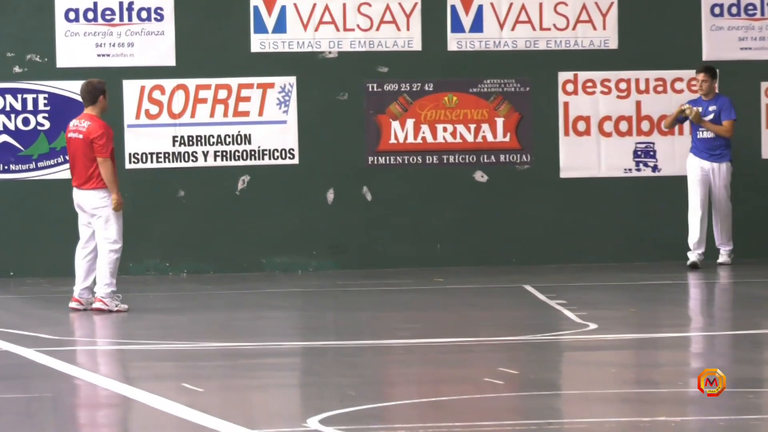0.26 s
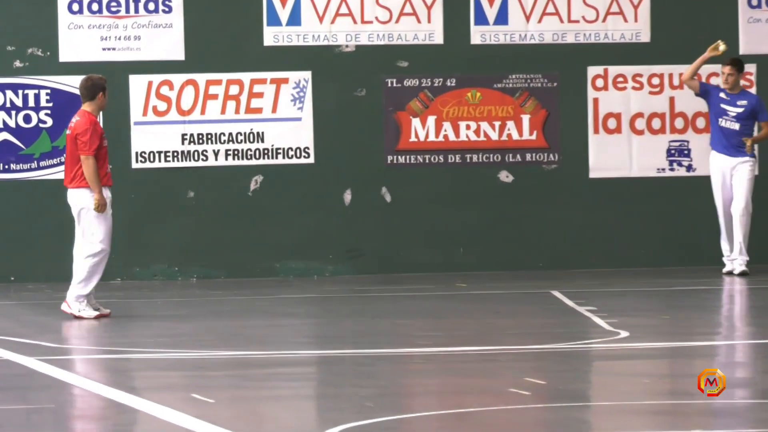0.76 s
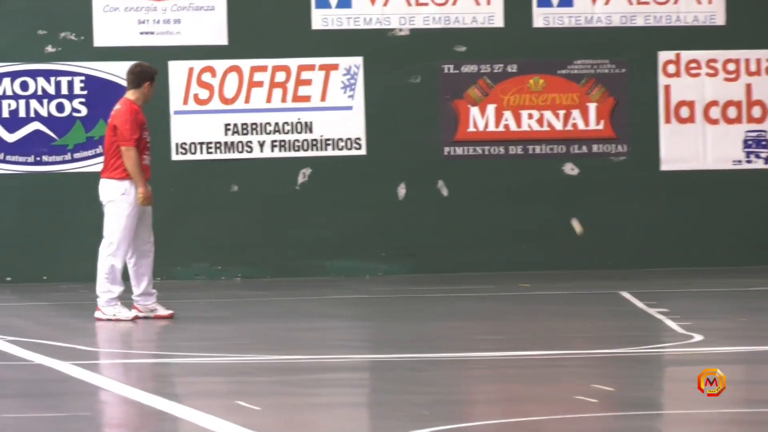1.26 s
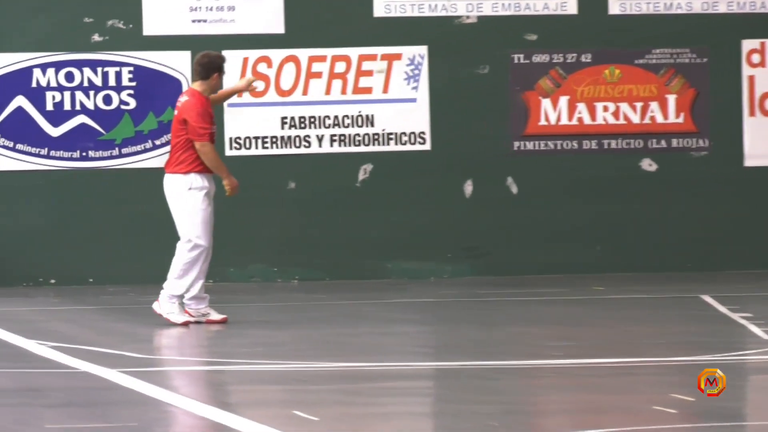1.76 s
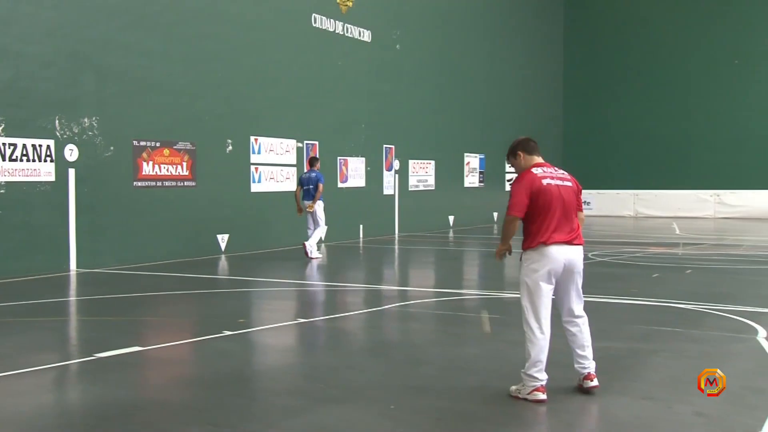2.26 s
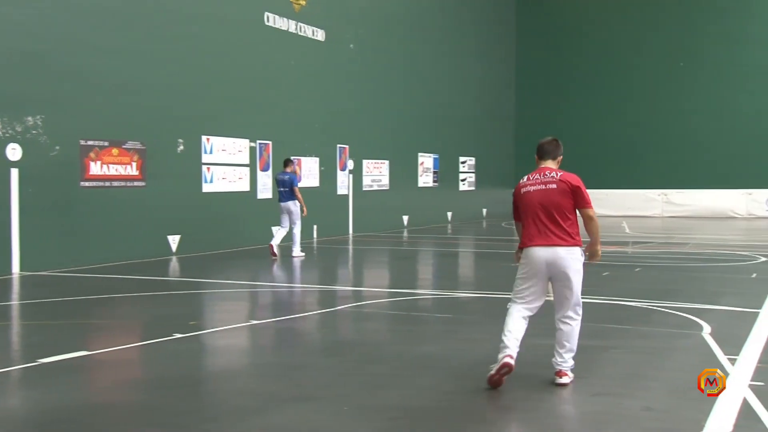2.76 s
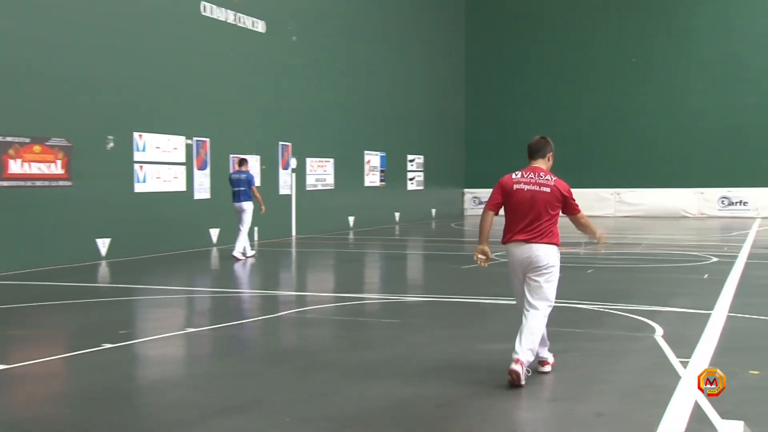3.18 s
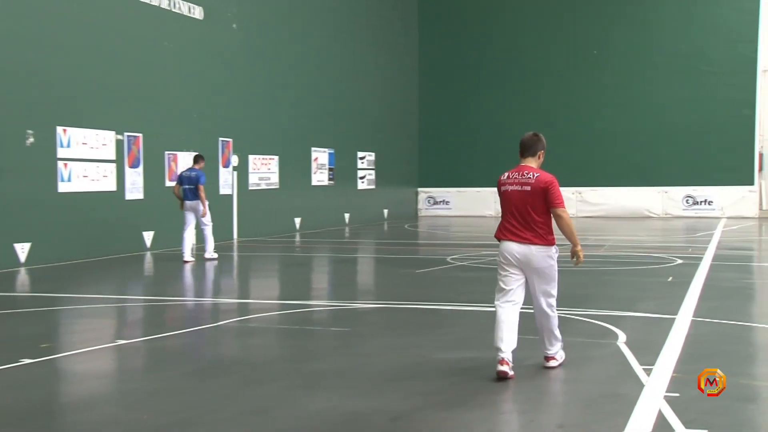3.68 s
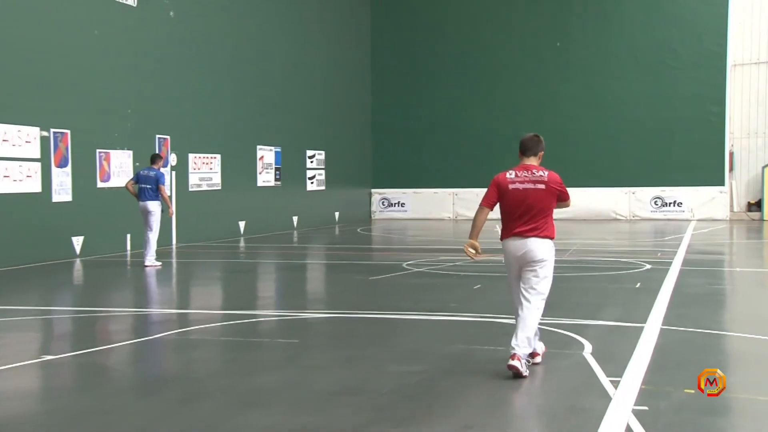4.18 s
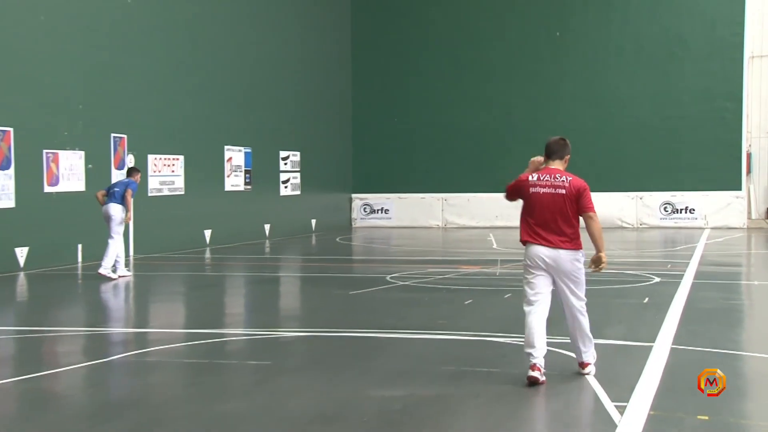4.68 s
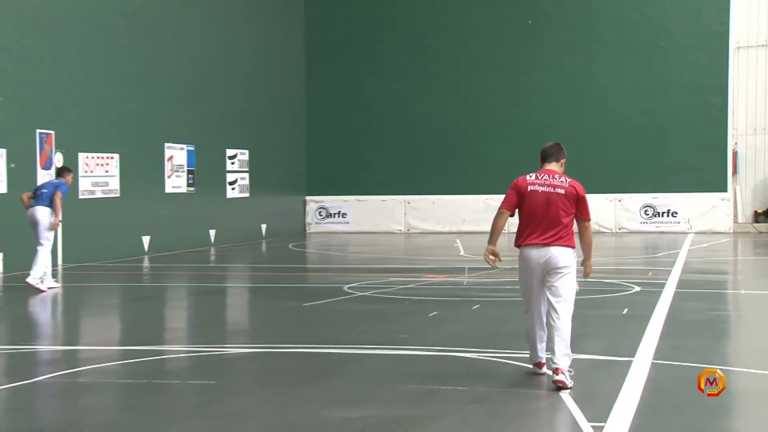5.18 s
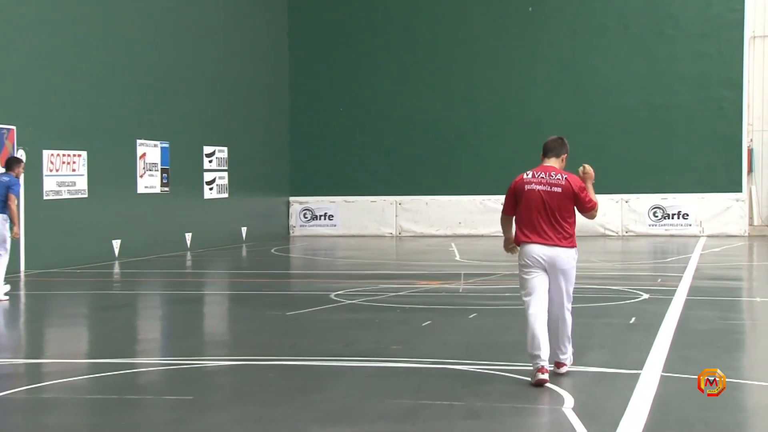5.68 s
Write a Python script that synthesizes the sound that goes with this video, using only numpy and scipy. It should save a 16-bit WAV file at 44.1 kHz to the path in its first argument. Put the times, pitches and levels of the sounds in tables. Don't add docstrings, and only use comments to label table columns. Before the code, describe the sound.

A hard small ball cracks loudly seven times on a concrete court, each bounce answered by sharp wall echoes and a long hall tail.

```python
import sys
import numpy as np
from scipy import signal
from scipy.io import wavfile

SR = 44100
rng = np.random.default_rng(int(sys.argv[2]) if len(sys.argv) > 2 else 0)


def convert_level_to_amplitude(level_db):
    exponent = np.asarray(level_db, float) / 20
    return 10 ** exponent


def to_wav(s):
    ch = np.atleast_2d(s).T
    pcm = np.round(np.clip(ch, -1, 1) * 32767)
    wavfile.write(sys.argv[1], SR, pcm.astype(np.int16))


N = 261513

# crack start in seconds, crack level in dB, first touch level in dB,
# slab reflection delay in ms, its level in dB.
HITS = [
    (1.3504, -1.6, -18.7, 1.4, -14.5),
    (2.3065, -11.7, -21.5, 2.5, -11.0),
    (2.8031, -9.8, -19.8, 3.0, -18.6),
    (3.289, -5.5, -11.9, 3.1, -9.9),
    (3.8402, -3.1, -12.3, 3.0, -7.0),
    (4.5024, -18.4, -17.1, 2.8, -13.5),
    (5.0027, -19.9, -23.9, 2.9, -19.7),
]
# thump level in dB, thump pitch in Hz, far thump level in dB, slap level in dB,
# edge level relative to crack in dB.
HIT_WEIGHTS = [(-34, 290, -46, -25.5, -19), (-36.5, 280, -43, -27, -18), (-31, 255, -37, -31, -25),
               (-32, 270, -38, -30, -27), (-33, 270, -42, -26, -23), (-34, 270, -38, -25, -13),
               (-35.5, 230, -39, -29, -23)]
# delay in ms, level in dB, level of its return across the court in dB,
# stray echo level in dB, slap pitch in Hz.
LONG_WALL = [(57.3, -4.9, -21, -24, 805), (60.2, -20.8, -24, -28, 1530), (58.8, -13.4, -17.8, -28, 818),
             (58.1, -11.9, -22.6, -19, 1470), (56.9, -5.1, -17.2, -18, 1510), (55.3, -13.3, -21, -17, 1420),
             (54.5, -21.5, -26.3, -30, 1400)]

ACROSS_MS, TOUCH_LEAD_MS, SLAP_LEAD_MS = 80.1, 1.9, 1.6


def at_hz(points, hz):
    points = np.array(points)
    return np.interp(np.log(hz), np.log(points[:, 0]), points[:, 1])


def resonate(x, hz, width_hz, count=1):
    r = np.exp(-np.pi * width_hz / SR)
    b = [(1 - r * r) / 2, 0, (r * r - 1) / 2]
    a = [1, -2 * r * np.cos(2 * np.pi * hz / SR), r * r]
    for _ in range(count):
        x = signal.lfilter(b, a, x)
    return x


def dull(x, hz):
    sos = signal.butter(4, min(hz, 20000), fs=SR, output="sos")
    return signal.sosfilt(sos, x)


def peak_one(x):
    return x / np.abs(x).max()


def add(out, s, sound):
    i = round(s * SR)
    out[i:i + len(sound)] += sound[:N - i]


def cracks():
    out, t = np.zeros(N), np.arange(800) / SR
    click = 1. * (t == 0)
    body = resonate(click, 1200, 1500, count=2) - 1.3 * resonate(click, 2600, 1200, count=2)
    body = peak_one(dull(body, 4500))
    edge = peak_one(dull(resonate(click, 7600, 3300, count=2), 10300))
    paths = arrivals()
    roughs = dull(rng.standard_normal((len(paths), len(t))), 5900)
    for (s, db, hz, body_db, edge_db, scatter_db), rough in zip(paths, roughs):
        shell = peak_one(resonate(dull(click, 6000), hz, 2200, count=3))
        wake = resonate(rough, .9 * hz, 3500, count=2) + convert_level_to_amplitude(body_db + 7) * resonate(rough, 1900, 2200)
        wake = convert_level_to_amplitude(scatter_db + 11) * wake * (1 - np.exp(-t / .0007)) * np.exp(-t / .004)
        crack = shell + convert_level_to_amplitude(body_db - .6) * body + convert_level_to_amplitude(edge_db - 1.5) * edge + wake
        add(out, s - .0005, convert_level_to_amplitude(db - .6) * crack)
    return out


def arrivals():
    # side wall delay in ms, level in dB,
    # roof delay in ms, level in dB.
    near_surfaces = [(25.3, -14.4, 39.8, -13.8), (21.5, -16.9, 41.2, -22.6), (20.8, -14.7, 42.1, -25),
                     (20.9, -15.9, 42.7, -11.2), (12.2, -18.1, 41.7, -8.5), (11.3, -18.3, 40.7, -13.6),
                     (11.1, -28, 40.8, -14.3)]
    # delay in ms, relative level in dB.
    stray_echoes = [(22.5, -1), (38.5, 1), (56.1, -.6), (133, -4)]
    # start in seconds,
    # peak level in dB, crack pitch in Hz, body relative level in dB, edge relative level in dB.
    loose_arrivals = [(2.4471, -6.6, 4700, -9.7, -40), (2.449, -15.4, 4530, -13, -32),
                      (2.5285, -21, 4940, -13.6, -40), (3.2992, -17.2, 3240, -12.8, -36),
                      (3.89, -18.1, 4870, -12.8, -5.3), (1.6274, -23.7, 3130, -18, -40)]
    # crack pitch in Hz, body rel dB, edge shift dB, scatter rel dB
    touch, direct, slab = (3750, -9.5, 6, -20), (4300, -12, 1.1, -22), (4050, -12, -1, -22)
    side, roof, wall = (4600, -22, 3, -18), (4150, -22, 3.5, -21), (4150, -4, 1.5, -22)
    back, stray, second_face = (3900, -5, 1.5, -16), (4200, -11, 3, -17), (3350, -6, -6, -26)
    # later by ms, rel dB
    slab_twin, roof_twin, back_twin, wall_twin = (1.9, -13), (3.1, -12), (3.1, -5), (1.7, 5)
    spread_db, spread_pitch = 1.5, .04
    body_loss_per_db = .35
    air_db_per_ms, touch_trim_db = .09, -1.6
    rows = []
    for hit, weight, near, far in zip(HITS, HIT_WEIGHTS, near_surfaces, LONG_WALL):
        s, db, touch_db, slab_ms, slab_db = hit
        side_ms, side_db, roof_ms, roof_db = near
        wall_ms, wall_db, return_db, stray_db, _ = far
        paths = [(-TOUCH_LEAD_MS, touch_db + touch_trim_db, touch),
                 (0, db, direct),
                 (slab_ms, slab_db, slab),
                 (side_ms, side_db, side),
                 (roof_ms, roof_db, roof),
                 (wall_ms, wall_db, wall),
                 (wall_ms + ACROSS_MS, return_db, back)]
        twins = zip([paths[k] for k in (2, 4, 6)], [slab_twin, roof_twin, back_twin])
        paths += [(ms + later, level + loss, colour) for (ms, level, colour), (later, loss) in twins]
        paths += [(wall_ms + wall_twin[0], stray_db + wall_twin[1], second_face)]
        paths += [(wall_ms + later, stray_db + loss, stray) for later, loss in stray_echoes]
        chance = rng.standard_normal((len(paths), 3))
        for (ms, level, (hz, body_db, edge_db, scatter_db)), (a, b, c) in zip(paths, chance):
            path_hz = hz * (1 + spread_pitch * a)
            path_body_db = min(body_db - body_loss_per_db * (level + 13) + spread_db * b, 0)
            path_edge_db = weight[-1] + edge_db - air_db_per_ms * ms + spread_db * c
            rows.append((s + ms / 1000, level, path_hz, path_body_db, path_edge_db, scatter_db))
    return rows + [(*row, -21) for row in loose_arrivals]


def snaps():
    snap_db, snap_hz, snap_s = -39.5, 6500, .0045
    out, t = np.zeros(N), np.arange(600) / SR
    sos = signal.butter(2, snap_hz, "high", fs=SR, output="sos")
    for (s, _, touch_db, *_), rough in zip(HITS, rng.standard_normal((len(HITS), len(t)))):
        burst = signal.sosfilt(sos, resonate(rough, 8500, 4500)) * np.exp(-(t / snap_s) ** 2)
        add(out, s - TOUCH_LEAD_MS / 1000, convert_level_to_amplitude(snap_db + .3 * (touch_db + 18)) * peak_one(burst))
    return out


def thumps():
    out, t = np.zeros(N), np.arange(5000) / SR
    thuds, slaps = low_echoes()
    for (s, db, hz, t60), rough in zip(thuds, rng.standard_normal((len(thuds), len(t)))):
        push = (t == 0) + .09 * rough * np.exp(-t / .022)
        slab = peak_one(resonate(push, hz, 11.0 / t60, count=2))
        deep = peak_one(resonate(push, .52 * hz, 80, count=3))
        knock = peak_one(resonate(push, 1.8 * hz, 350, count=2))
        knock = np.roll(knock, round(.008 * SR))
        add(out, s, convert_level_to_amplitude(db + .1) * (slab + .3 * deep + .6 * knock))
    for (s, db, hz), rough in zip(slaps, rng.standard_normal((len(slaps), len(t)))):
        push = (t == 0) + .1 * rough * np.exp(-t / .004)
        add(out, s + .0006, convert_level_to_amplitude(db - 2.5) * peak_one(resonate(push, hz, 450, count=2)))
    return out


def low_echoes():
    thump_lead_ms, thump_t60_s = 11.1, .075
    far_lead_ms, far_hz, far_t60_s = 3.1, 300, .05
    near_slap_hz, wall_slap_db, return_slap_db, second_slap_db = 880, 2.8, -1.2, -3
    thuds, slaps = [(.197, -50, 220, .08)], []
    for hit, weight, far in zip(HITS, HIT_WEIGHTS, LONG_WALL):
        s, wall_ms, wall_slap_hz = hit[0], far[0], far[-1]
        db, hz, far_db, slap_db, _ = weight
        wall_s = s + (wall_ms - SLAP_LEAD_MS) / 1000
        across_s = ACROSS_MS / 1000
        thuds += [(s - thump_lead_ms / 1000, db, hz, thump_t60_s),
                  (wall_s + 2 * across_s - far_lead_ms / 1000, far_db, far_hz, far_t60_s)]
        slaps += [(s - SLAP_LEAD_MS / 1000, slap_db - 1.5, near_slap_hz),
                  (wall_s, slap_db + wall_slap_db, wall_slap_hz),
                  (wall_s + across_s, slap_db + return_slap_db, 1.1 * near_slap_hz),
                  (wall_s + 2 * across_s, slap_db + second_slap_db, near_slap_hz)]
    return thuds, slaps


def ribs():
    # start in seconds, level in dB, start pitch in Hz, end pitch in Hz,
    # length in seconds.
    rib_chirps = [(1.409, -15, 4200, 1900, .011), (2.448, -21, 5000, 2300, .009),
                  (2.863, -24, 4000, 2200, .008), (3.348, -19, 3400, 2500, .005),
                  (3.898, -17, 4200, 2500, .007), (4.559, -22, 3600, 2000, .006)]
    out = np.zeros(N)
    roughs = rng.standard_normal((len(rib_chirps), 1200))
    for (s, db, start_hz, end_hz, length_s), rough in zip(rib_chirps, roughs):
        u = np.linspace(0, 1, round(length_s * SR))
        pitch_hz = end_hz + (start_hz - end_hz) * (1 - u) ** 1.6
        phase = 2 * np.pi * np.cumsum(pitch_hz) / SR
        uneven = 1 + 2.5 * resonate(rough, 500, 900)[-len(u):]
        swell = np.sin(np.pi * u ** .6) ** .7
        add(out, s, convert_level_to_amplitude(db - 3) * dull(np.sin(phase) * uneven * swell, 5200))
    return out


def hall():
    # start in seconds, tail level in dB, brightness in dB per octave,
    # bass in dB, build-up in seconds.
    tail_feeds = [(-1.5, -40.5, 2.5, -3, .05), (1.35, -30.3, -.3, -1.5, .075), (2.306, -33.5, .1, 2.1, .04),
                  (2.445, -40, -3, -8, .03), (2.802, -33, -1.3, 3, .05), (3.288, -31.3, -.8, .1, .05),
                  (3.839, -28, 1.8, -2.2, .05), (4.502, -30, .8, .1, .04), (5.002, -37, -4.5, .1, .05)]
    # frequency in Hz, density in dB per Hz.
    tail_spectrum = [(40, -14), (160, -8), (320, -7), (600, -5.5), (900, -4), (1320, -7.8), (1900, .8),
                     (2600, 2.2), (3500, 2.6), (4500, 2.4), (5300, -3.5), (6300, -13), (7500, -16.5),
                     (9300, -23.3), (11500, -35), (15000, -50)]
    # frequency in Hz, T60 in seconds.
    hall_t60 = [(60, 2.5), (150, 3.4), (300, 4.2), (700, 5.2), (1800, 5.), (3000, 3.9), (5000, 2.35),
                (8000, 1.2), (13000, .65)]
    # frequency in Hz, density in dB per Hz.
    floor_spectrum = [(25, -10), (36, -14), (55, -3), (120, -14), (230, -12), (450, -19), (1000, -22),
                      (2500, -25), (4500, -28), (6500, -34), (10000, -36), (16000, -37)]
    # centre in seconds, swell in dB.
    shudders = [(0.01, 2.5), (1.4, 5), (2.89, 9), (3.32, 7), (3.98, 9), (4.6, 4), (5.1, 4), (5.61, 8)]
    floor_db, rumble_base_db, shudder_s = -56, -2.2, .15
    early_share = .06
    out, t = np.zeros(N), np.arange(0, N + 64, 64) / SR
    white = rng.standard_normal((2, N))
    edges = 22 * 2 ** (np.arange(39) / 4)
    widths, centres = np.diff(edges), np.sqrt(edges[1:] * edges[:-1])
    tail_sum = np.sum(convert_level_to_amplitude(at_hz(tail_spectrum, centres)) ** 2 * widths)
    floor_sum = np.sum(convert_level_to_amplitude(at_hz(floor_spectrum, centres)) ** 2 * widths)
    clumps = signal.lfilter([.6], [1, -.75], rng.standard_normal((len(centres) + 1, len(t))))
    rumble_db = rumble_base_db + sum(db * np.exp(-((t - s) / shudder_s) ** 2) for s, db in shudders)
    for k, hz in enumerate(centres):
        band_db = floor_db + at_hz(floor_spectrum, hz) + rumble_db / (1 + (hz / 110) ** 4)
        power = convert_level_to_amplitude(band_db) ** 2 / floor_sum
        clump = .8 * clumps[-1] + .6 * clumps[k]
        for s, db, bright_db, bass_db, build_s in tail_feeds:
            age = np.maximum(t - s, 0)
            colour_db = at_hz(tail_spectrum, hz) + bright_db * np.log2(max(hz, 1000) / 3000)
            colour_db += bass_db / (1 + (hz / 350) ** 2)
            rise = 1 - np.exp(-(age / max(build_s, .005) * (hz / 3000) ** .25) ** 1.3)
            rise = np.where(age > 0, early_share / (1 + (4200 / hz) ** 4) + rise, 0)
            fall = convert_level_to_amplitude(-60 * age / at_hz(hall_t60, hz)) ** 2
            fall *= 1 + .45 * np.exp(-age / .12)
            grain = convert_level_to_amplitude(3.5 * clump * np.exp(-age / .25))
            power = power + convert_level_to_amplitude(db + colour_db) ** 2 / tail_sum * rise * fall * grain
        sos = signal.butter(3, edges[k:k + 2], "band", fs=SR, output="sos")
        level = np.interp(np.arange(N) / SR, t, np.sqrt(power * SR / 2))
        out += signal.sosfilt(sos, white[k % 2]) * level
    return out


def background():
    # frequency in Hz, rms level in dB.
    hum_lines = [(28, -72), (50, -68), (63, -69), (99, -69), (250, -70), (880, -77), (15575, -92),
                 (15625, -77), (15675, -92)]
    # centre in seconds, level in dB, pitch in Hz, width in Hz, half length in seconds.
    shoe_squeaks = [(.47, -63, 5550, 350, .03), (.53, -76, 5600, 1500, .09), (.45, -67, 3900, 500, .02),
                    (.12, -70, 4200, 900, .08)]
    t = np.arange(N) / SR
    out = sum(convert_level_to_amplitude(db + 3) * np.sin(2 * np.pi * hz * t) for hz, db in hum_lines)
    white = rng.standard_normal(N)
    for s, db, hz, width_hz, half_s in shoe_squeaks:
        out += convert_level_to_amplitude(db + 20) * resonate(white, hz, width_hz, count=2) * np.exp(-((t - s) / half_s) ** 2)
    return out


def scene():
    mono = cracks() + snaps() + thumps() + ribs() + hall() + background()
    return np.tile(mono, (2, 1))


def roll_off(x):
    return signal.sosfilt(signal.butter(12, 16800, fs=SR, output="sos"), x)


def record(dry):
    sos = signal.ellip(12, .3, 60, 15900, fs=SR, output="sos")
    return roll_off(signal.sosfilt(sos, dry))


dry = scene()
out = record(dry)
to_wav(out)
```